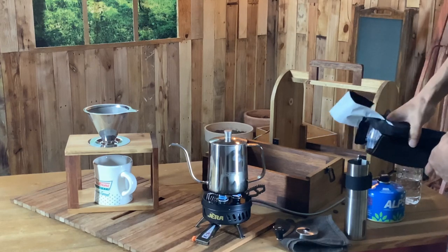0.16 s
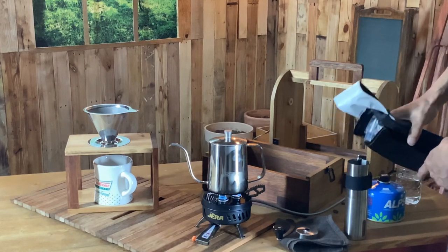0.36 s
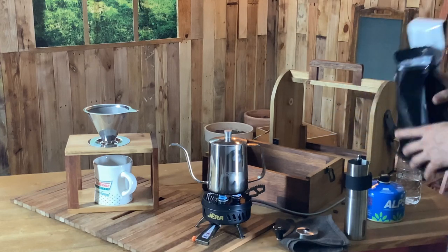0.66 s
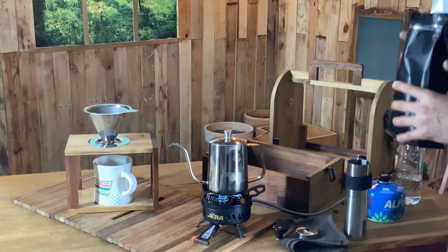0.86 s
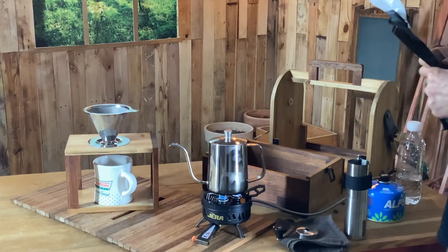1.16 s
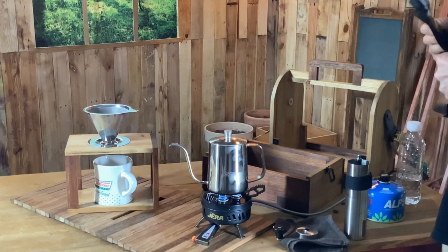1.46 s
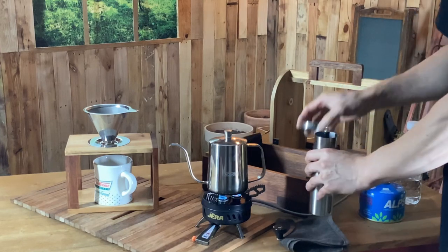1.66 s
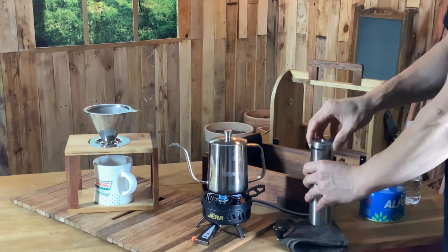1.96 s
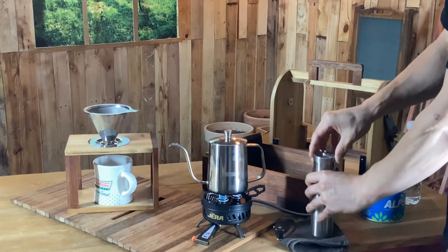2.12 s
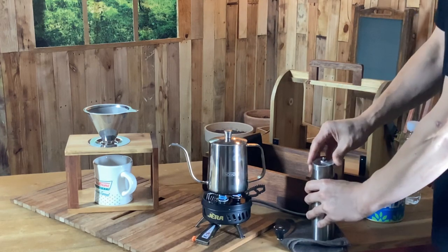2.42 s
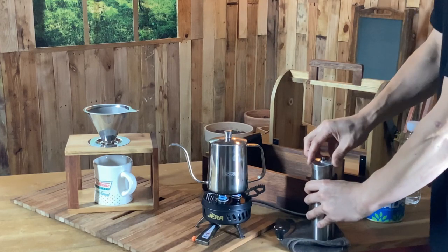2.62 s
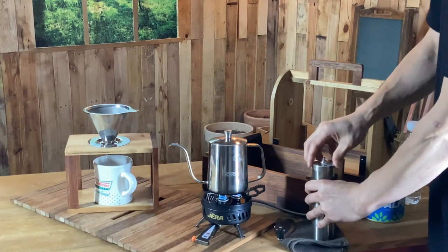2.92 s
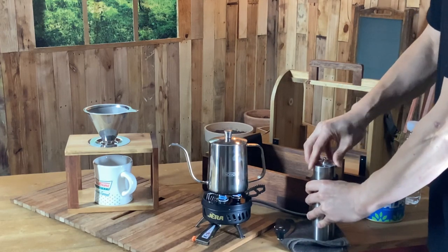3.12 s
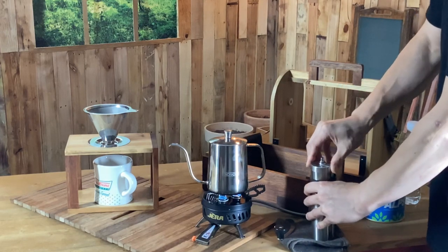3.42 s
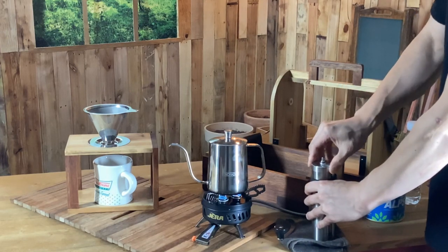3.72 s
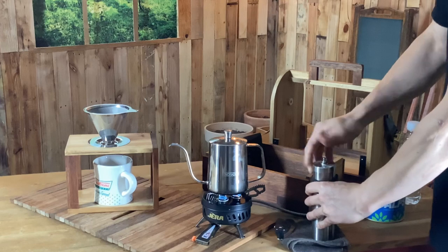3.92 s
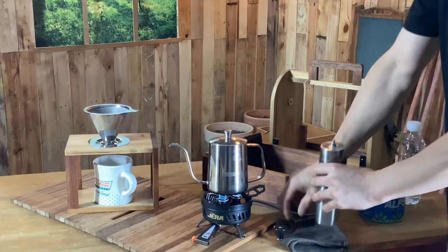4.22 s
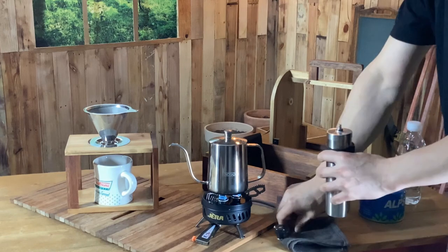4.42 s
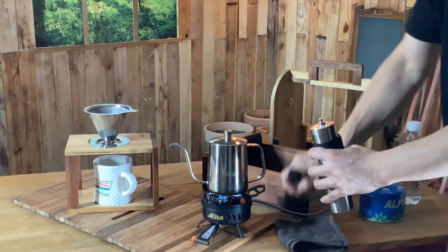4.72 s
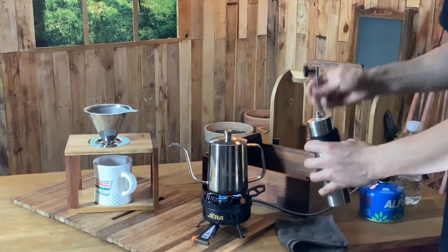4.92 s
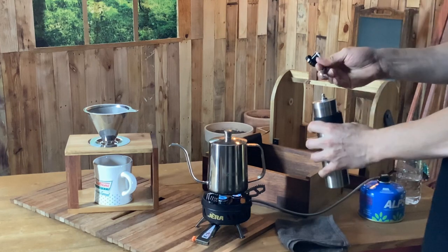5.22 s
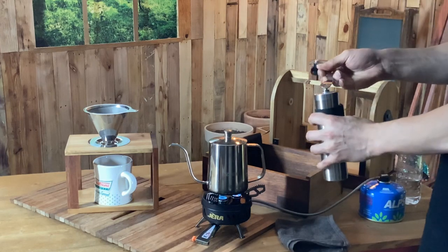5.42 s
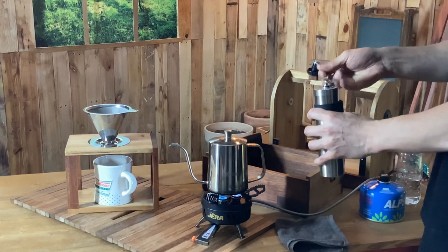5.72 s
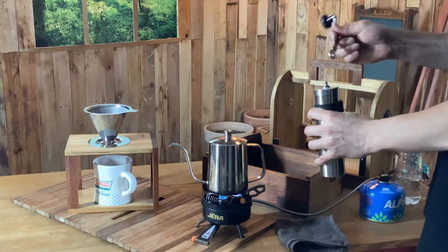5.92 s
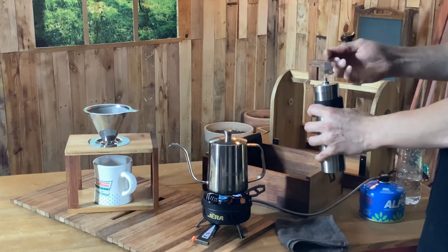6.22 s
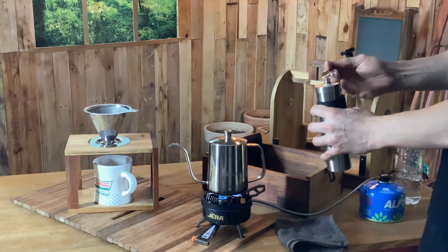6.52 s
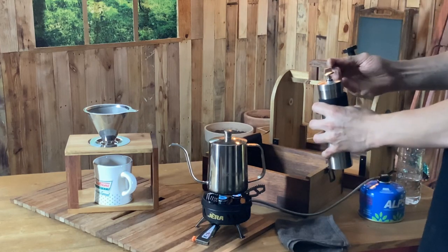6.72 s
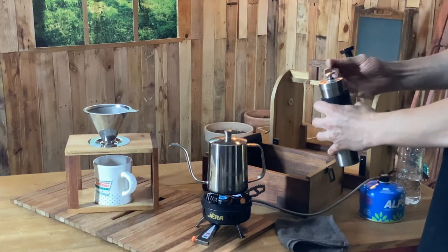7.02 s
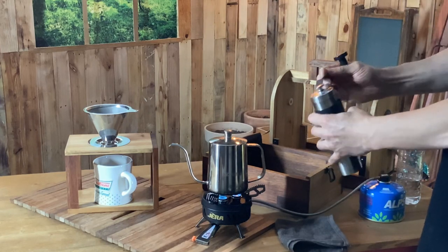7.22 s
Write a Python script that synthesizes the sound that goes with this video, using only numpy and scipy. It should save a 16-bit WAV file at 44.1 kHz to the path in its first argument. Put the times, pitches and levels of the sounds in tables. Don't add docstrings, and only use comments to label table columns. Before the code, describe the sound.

In a reverberant wooden cabin, coffee beans patter in a foil bag that crackles with growing snaps, then cuts off abruptly. A steel grinder lid ticks, scrapes and seats with a dull knock. After a quiet gap, a metal crank clinks brightly and clacks home on its shaft. A gas burner hums and hisses faintly throughout. One distant microphone, slightly limited treble with tiny dropouts.

```python
import sys
import numpy as np
from scipy import signal
from scipy.fft import rfft, irfft
from scipy.io import wavfile
from scipy.ndimage import uniform_filter1d

SR = 44100
rng = np.random.default_rng(int(sys.argv[2]) if len(sys.argv) > 2 else 0)


def undo_db(level):
    steps = np.asarray(level, float) / 20
    return 10 ** steps


def int16_out(signal):
    q = np.round(np.clip(np.atleast_2d(signal).T, -1, 1) * 32767)
    wavfile.write(sys.argv[1], SR, q.astype(np.int16))


N = 324576
T = np.arange(N) / SR

# frequency in Hz, density in dB per Hz.
FOIL_COLOUR = [(88, -68), (150, -7), (226, -5.5), (662, -5.5), (730, -1.5), (821, 0.5), (1980, -1),
               (5790, -6.5), (6390, -15), (14200, -22.5), (16000, -26.5)]
# frequency in Hz, level in dB, t60 in seconds.
LID_MODES = [(1050, -16, .03), (1970, -15, 0.032), (2500, -17, 0.018), (2800, -15, 0.025),
             (4022, -5, 0.065), (4110, -16, .03), (5880, -17, 0.03), (7200, -16, 0.0099), (9560, -19, .015),
             (11100, -24, 0.05), (14010, -28, .015)]
# frequency in Hz, level in dB, t60 in seconds.
GRIPPED_MODES = [(2400, -15, .018), (3887, -9, .024), (4500, -14, .012), (5324, -13, .018), (6090, -9, .05),
                 (6200, 0, .025), (8780, -16, .04), (9500, -25, .015), (11650, -36, .03), (14600, -30, .02),
                 (15500, -30, .02)]
# centre in seconds, length in seconds, lower edge in Hz, depth in dB.
TREBLE_DIPS = [(0.031, 0.019, 6000, -22), (.265, 0.016, 6300, -15), (0.436, 0.013, 5700, -10),
               (0.543, .012, 6300, -15), (1.04, 0.026, 7500, -18), (2.035, .014, 6500, -5),
               (2.955, .014, 5500, -12), (4.744, 0.017, 9100, -15), (5.045, .016, 6360, -8),
               (6.945, .016, 7300, -8), (7.03, .016, 6500, -8)]


def evened(x):
    return x / np.sqrt(np.mean(x ** 2) + 1e-20)


def read(points, hz):
    f, value = np.transpose(points)
    return np.interp(np.log(hz + 1), np.log(f + 1), value)


def add(mix, start_s, sound):
    part = mix[round(start_s * SR):][:len(sound)]
    part += sound[:len(part)]


def colour(x, points):
    gain_db = np.maximum(read(points, abs(np.fft.fftfreq(4096, 1 / SR))), -90)
    log_gain = np.log(undo_db(gain_db))
    taps = np.fft.ifft(np.exp(np.conj(signal.hilbert(log_gain)))).real[:2048]
    return signal.oaconvolve(x, taps / np.linalg.norm(taps))[:len(x)]


def tilt(x, bright_db, split_hz):
    low = signal.sosfilt(signal.butter(2, split_hz, fs=SR, output="sos"), x)
    high = signal.sosfilt(signal.butter(2, split_hz, "high", fs=SR, output="sos"), x)
    return low - undo_db(bright_db) * high


def band(x, lo_hz, hi_hz):
    if lo_hz:
        x = signal.sosfilt(signal.butter(5, lo_hz, "high", fs=SR, output="sos"), x)
    if hi_hz:
        x = signal.sosfilt(signal.butter(5, hi_hz, fs=SR, output="sos"), x)
    return evened(x)


def grains(per_s, spread_db):
    size = undo_db(spread_db * np.minimum(rng.exponential(1, N), 4)) * rng.standard_normal(N)
    return evened(size * (rng.random(N) < per_s / SR))


def ring(modes, detune=0, size=8192):
    t, total = T[:size], np.zeros(size)
    for k, (hz, db, t60_s) in enumerate(modes):
        decay = undo_db(db - 60 * t / t60_s)
        total += (-1) ** k * decay * np.sin(2 * np.pi * hz * (1 + detune) * t)
    return total / 2


def gestures(rows):
    peak_s, swell_s, ebb_s, db, colour_db = np.transpose(rows)[:, :, None]
    t = T[::32]
    fall_db = 20 * np.maximum((peak_s - t) / swell_s, (t - peak_s) / ebb_s)
    power = undo_db(db - fall_db) ** 2 + 1e-30
    total = power.sum(0)
    blend_db = 10 * np.log10((power * undo_db(colour_db) ** 2).sum(0) / total)
    return np.interp(T, t, np.sqrt(total)), np.interp(T, t, blend_db)


def bean_patter():
    # peak in seconds, swell in seconds per 20 dB,
    # ebb in seconds per 20 dB, level in dB, crispness in dB.
    surges = [(0.067, .004, .1, -66, 26), (0.36, .2, .2, -48, -18), (0.535, .25, .14, -32, -5),
              (0.7, .22, .16, -27.5, 1.5), (0.856, .018, .045, -29, -10), (0.918, .008, .3, -37, 0),
              (0.955, .03, .15, -36, 3), (1.03, .1, .25, -35.5, -14), (1.192, .11, .15, -32, 7.5),
              (1.27, .1, .2, -36.5, -7), (1.372, .012, .09, -38.5, 7), (1.456, .012, .09, -33, 6),
              (1.57, .2, .1, -42, 6)]
    # frequency in Hz, density in dB per Hz.
    bean_colour = [(88, -48), (150, -19.5), (282, -6), (387, -8), (466, -6.5), (720, -0.5), (2120, -4),
                   (3500, -16), (4550, -48), (7700, -120)]
    # lower edge in Hz, upper edge in Hz (None is open).
    bands_hz = [(None, 2540), (2040, 7700), (6900, None)]
    level, crisp_db = gestures(surges)
    rattle_db = np.where(T < 0.9, -8.5, -1.5) + 0.4 * crisp_db
    fizz_db = -11 + crisp_db
    thuds = band(colour(grains(1600, 1.6) + 0.62 * rng.standard_normal(N), bean_colour), *bands_hz[0])
    rattle = band(colour(grains(2500, 2.5) + 0.76 * rng.standard_normal(N), FOIL_COLOUR), *bands_hz[1])
    fizz = band(colour(grains(6000, 4.3) + 1.2 * rng.standard_normal(N), FOIL_COLOUR), *bands_hz[2])
    patter = thuds + undo_db(rattle_db) * rattle + undo_db(fizz_db) * fizz
    clumps = evened(uniform_filter1d(uniform_filter1d(rng.standard_normal(N), 400), 400))
    return undo_db(-7.3 + 1.6 * clumps) * level * patter


def foil_snaps():
    # start in seconds, peak in dB, brightness in dB, facet pitch in Hz.
    snaps = [(0.0662, -29, 42, 5330), (0.0794, -44, 12, 4500), (0.145, -50, 6, 4600),
             (0.3217, -38, -19, 1500), (0.3755, -37, -6, 1070), (0.3911, -36, -17, 2220),
             (0.433, -33, -15, 1160), (0.461, -32, -4, 2400), (0.4769, -31, -12, 1140),
             (0.4978, -28, -12, 1130), (0.517, -25, -3, 2200), (0.547, -25, -10, 1200),
             (0.614, -25, -10, 900), (0.6399, -22, -8, 2100), (0.651, -23, -8, 1000), (0.6675, -21, 0, 860),
             (0.693, -23, -4, 1400), (0.718, -24, -6, 1000), (0.764, -27, -8, 900),
             (0.8512, -19, -19, 1880), (0.8614, -30, 2, 800), (0.9148, -21, -4, 2130),
             (0.9244, -21, -8, 1200), (0.9497, -19, 6, 1170), (0.9744, -27, -14, 1000),
             (1.039, -22, 1, 1940), (1.0829, -23, -8, 754), (1.1223, -24, -10, 2160),
             (1.1324, -22, -13, 950), (1.1543, -16, 4, 2020), (1.1823, -9.5, 8, 2200),
             (1.1924, -15, 4, 1200), (1.2064, -14, 14, 3900), (1.2434, -17.5, 6, 2770),
             (1.2545, -14, -4, 1900), (1.285, -24, -8, 1000), (1.372, -27, -1, 2240),
             (1.3815, -23, 9, 2390), (1.3924, -21, -9, 3000), (1.4514, -28, -4, 1000),
             (1.4626, -14, 7, 3400), (1.4744, -21, 10, 5000)]
    out, t = np.zeros(N), T[:2048]
    envelope = undo_db(-60 * t / 0.016) * (1 - np.exp(-t / 0.0019))
    for start_s, db, bright_db, hz in snaps:
        noise, roughness = rng.standard_normal((2, 2048))
        cracks = noise * np.exp(0.85 * roughness) * envelope
        snap = tilt(colour(cracks, FOIL_COLOUR), bright_db, 3660)
        facet = ring([(hz, 0, 6 / hz)], size=2048)
        pop = band(signal.oaconvolve(cracks, facet)[:2048], hz / 2, None)
        add(out, start_s, undo_db(db - 7) * (snap / abs(snap).max() + undo_db(-3) * pop / abs(pop).max()))
    return out


def knocks(events, modes, tick_colour, chatter_s, thud_db):
    # frequency in Hz, density in dB per Hz.
    thud_colour = [(150, -10), (700, 0), (1300, -5), (3000, -31)]
    out, t = np.zeros(N), T[:2048]
    for start_s, db, ring_db, bright_db in events:
        noise = rng.standard_normal(2048)
        chatter = 0.14 * noise * undo_db(-60 * t / chatter_s)
        chatter[16] += 1
        tick = tilt(colour(chatter, tick_colour), bright_db, 7200)
        thud = colour(noise * undo_db(-60 * t / 0.034), thud_colour)
        rung = tilt(ring(modes, 0.002 * noise[0]), bright_db, 7800)
        push_db = thud_db + 0.6 * (db + 35)
        add(out, start_s, undo_db(db - 3.5) * tick / abs(tick).max())
        add(out, start_s, undo_db(push_db) * thud / abs(thud).max())
        add(out, start_s + 0.0005, undo_db(db + ring_db) * rung)
    return out


def lid_knocks():
    # start in seconds, peak in dB, ring in dB, brightness in dB.
    loose_knocks = [(1.8647, -54, 0, -14), (1.9658, -37, 11, 0), (1.9844, -32, 7, 2), (2.0522, -38, 2, -8),
                    (2.0794, -34, -10, -10), (2.143, -40, 1, -12), (2.1656, -44, 2, -10),
                    (2.1894, -44, -2, -6), (2.205, -47, 0, -10)]
    # start in seconds, peak in dB, ring in dB, brightness in dB.
    rim_hits = [
        (1.918, -33, -3.5, 1),
        (1.9223, -32, -4.5, 4),
    ]
    # start in seconds, peak in dB, ring in dB, brightness in dB.
    twist_knocks = [(2.5596, -52, -10, -20), (2.6838, -40, -6, -20), (2.7, -50, 0, -20),
                    (2.7684, -46, 0, -18), (2.8155, -38, 2, -20), (2.8246, -42, 2, -14),
                    (2.8398, -42, 0, -6), (2.852, -42, 0, -6), (2.8629, -25, -12, -12),
                    (2.8744, -34, -10, -3)]
    # start in seconds, peak in dB, ring in dB, brightness in dB.
    seat_knocks = [
        (3.3144, -30, -10, -16),
        (3.3233, -25.5, -10, -5),
    ]
    # frequency in Hz, level in dB, t60 in seconds.
    rim_modes = [(1270, 0, 0.057), (2900, -10, .015), (4100, -9, .03), (4860, -6, .015), (5300, -7, .012),
                 (5810, -8, 0.025), (6500, -8, .01), (7020, -7, 0.012), (8284, -11, 0.071),
                 (11100, -6, .015)]
    # frequency in Hz, level in dB, t60 in seconds.
    twist_modes = [(1050, -14, .03), (1950, -8, .035), (2450, -16, .03), (2850, -5, .035), (3450, -18, .02),
                   (4050, -2, .04), (4550, -7, .025), (5850, -13, .03), (7500, -20, .015),
                   (11100, -24, .04)]
    # frequency in Hz, level in dB, t60 in seconds.
    seat_modes = [(564, 1, 0.017), (804, -2, 0.037), (3000, -16, .015), (5071, 0, 0.017), (8500, -11, 0.06),
                  (11080, -8, 0.057), (14900, -3, .012)]
    # frequency in Hz, density in dB per Hz.
    lid_tick = [(350, -35), (600, -9), (1280, -7), (2010, -14), (3040, 3), (4300, -1), (5710, -24),
                (8740, -7), (16000, -14)]
    # frequency in Hz, density in dB per Hz.
    seat_tick = [(700, -25), (1500, -16), (3500, -1), (5500, 2), (9500, -14), (15000, -5), (16000, -2)]
    out = knocks(loose_knocks, LID_MODES, lid_tick, 0.0071, thud_db=-48)
    out += knocks(seat_knocks, seat_modes, seat_tick, 0.022, thud_db=-42)
    out += knocks(rim_hits, rim_modes, lid_tick, 0.017, thud_db=-54)
    out += knocks(twist_knocks, twist_modes, lid_tick, 0.008, thud_db=-50)
    return out


def crank_knocks():
    # start in seconds, peak in dB, ring in dB, brightness in dB.
    gripped_knocks = [(4.646, -57, -2, -3), (4.6967, -19.5, -5, 3), (5.7986, -36, -5, -8),
                      (5.8282, -39, -5, -3), (5.845, -38, -3, 4), (5.8726, -28, -6, -2),
                      (5.8844, -39, 0, -2), (5.8988, -31.5, -6, -6), (5.981, -27.5, 0, -6),
                      (5.99, -38, 0, 0), (6.0042, -46, 3, 0)]
    # start in seconds, peak in dB, ring in dB, brightness in dB.
    free_knocks = [
        (5.3807, -23.5, -1.5, -1),
    ]
    # start in seconds, peak in dB, ring in dB, brightness in dB.
    edge_knocks = [
        (6.337, -19.5, -5, -4),
    ]
    # start in seconds, peak in dB, ring in dB, brightness in dB.
    clack_knocks = [(5.4876, -42.5, 0, -8), (5.5605, -45.5, -8, -16), (6.7265, -40, -4, -3),
                    (6.7296, -27, -4, -3), (6.741, -40, -6, -3), (7.3454, -55, 6.5, -7)]
    # start in seconds, peak in dB, ring in dB, brightness in dB.
    home_knocks = [
        (6.8283, -26, -8, 6),
        (6.8341, -19.5, -8, -2),
        (6.8397, -32, -6, 2),
        (6.849, -34, -6, 0),
        (6.875, -40, -4, -4),
    ]
    # frequency in Hz, level in dB, t60 in seconds.
    free_modes = [(2430, -9, .018), (3865, -20, .06), (5380, -20, .05), (5700, -1, .025), (6170, -12, .02),
                  (8310, -6, .03), (8450, -14, .06), (8790, -12, .02), (11690, -6, .08), (11790, -7, .025),
                  (13320, -24, .02), (14910, -14, .03)]
    # frequency in Hz, level in dB, t60 in seconds.
    edge_modes = [(2354, -13, 0.027), (3740, -13.5, 0.023), (5130, -16, .02), (5480, -13, 0.037),
                  (5840, -1.5, 0.026), (8230, -8.5, 0.02), (11700, -12.5, 0.021), (13310, -16, .03),
                  (14920, -10, .02)]
    # frequency in Hz, level in dB, t60 in seconds.
    clack_modes = [(1400, -16, .006), (2350, 0, 0.007), (3000, -7, 0.008), (3650, -10, .006),
                   (4270, 3, 0.008), (5150, -2, 0.015), (5830, -4, 0.012), (11600, -8.5, 0.0098),
                   (15000, -12, .02)]
    # frequency in Hz, level in dB, t60 in seconds.
    home_modes = [(996, -9, .01), (1600, -15, .008), (2444, -10, .015), (3564, -9, .01), (4500, 0, .012),
                  (5400, -2, .014), (6110, 2, .018), (6400, -5, .014), (7100, -9, .008), (8800, -13, .025),
                  (11650, -15, .015), (14900, -19, .015)]
    # frequency in Hz, density in dB per Hz.
    gripped_tick = [(700, -50), (1500, -6), (3800, -1.5), (6100, 2.5), (8800, -15), (10600, -43),
                    (14000, -26), (16000, -22)]
    # frequency in Hz, density in dB per Hz.
    free_tick = [(700, -50), (1500, 0.5), (4750, 3), (7200, 0.5), (10500, -6), (12200, -6), (12800, -38),
                 (14000, -32), (16000, -21)]
    # frequency in Hz, density in dB per Hz.
    clack_tick = [(700, -26), (1300, 6), (2600, 2), (5500, 0), (7000, -10), (9600, -6), (11400, -22),
                  (13300, -5), (15000, -5), (16000, -17)]
    out = knocks(gripped_knocks, GRIPPED_MODES, gripped_tick, 0.013, thud_db=-59)
    out += knocks(clack_knocks, clack_modes, clack_tick, 0.038, thud_db=-45)
    out += knocks(free_knocks, free_modes, free_tick, 0.04, thud_db=-53)
    out += knocks(edge_knocks, edge_modes, free_tick, 0.043, thud_db=-52)
    out += knocks(home_knocks, home_modes, clack_tick, 0.035, thud_db=-45)
    return out


def rubbing():
    # peak in seconds, swell in seconds per 20 dB, ebb in seconds per 20 dB,
    # level in dB, brightness in dB.
    lid_strokes = [(1.866, .004, .12, -58, -2), (1.93, .012, .04, -52, 10), (1.984, .025, .045, -46, 12),
                   (2.052, .006, .06, -50, -6), (2.19, .2, .04, -52, -14), (2.56, .008, .13, -55, -30),
                   (2.686, .005, .3, -56, -14), (2.76, .06, .04, -56, 2), (2.817, .004, .25, -53.5, -10),
                   (2.864, .045, .045, -49, 8), (3.324, .012, .12, -50, 4)]
    # peak in seconds, swell in seconds per 20 dB,
    # ebb in seconds per 20 dB, level in dB, brightness in dB.
    crank_strokes = [(4.648, .008, .04, -57, -12), (4.694, .03, .06, -55, -2), (5.8, .03, .3, -63, -3),
                     (5.896, .15, .14, -50, -8), (5.99, .015, .1, -49.5, -8), (6.6, .05, .1, -55, -12),
                     (6.722, .08, .012, -54, -20), (7.347, .008, .1, -70, 9)]
    # frequency in Hz, density in dB per Hz.
    steel_colour = [(180, -52), (300, -0.5), (725, -27), (870, 0.5), (1460, -5), (2840, -5), (4500, -7),
                    (6410, -14), (11300, -27.5), (16000, -20)]
    level, bright_db = gestures(lid_strokes + crank_strokes)
    slips = 0.5 * grains(2500, 2.5) + 0.5 * rng.standard_normal(N)
    lid_song = evened(signal.oaconvolve(slips, ring(LID_MODES))[:N]) * (T < 3.2)
    crank_song = evened(signal.oaconvolve(slips, ring(GRIPPED_MODES))[:N]) * (T > 4)
    sung = 1.5 * (lid_song + crank_song)
    return level * tilt(colour(slips, steel_colour) + 0.1 * sung, bright_db, 4160)


def sliding():
    # start in seconds, length in seconds, level in dB, pitch in Hz, width in Hz.
    slide_rows = [(0.07, .2, -66, 5000, 1800), (1.866, .05, -60, 3900, 900), (2.558, .06, -67, 2450, 250),
                  (6.31, .028, -64, 6100, 150), (6.56, .08, -59, 6050, 180), (6.585, .06, -59, 3300, 600),
                  (6.59, .06, -63, 4250, 400), (6.685, .045, -65, 4270, 250)]
    out, t = np.zeros(N), T[:16384]
    for start_s, length_s, db, hz, width_hz in slide_rows:
        edges_hz = [hz - width_hz / 2, hz + width_hz / 2]
        resonance = signal.butter(2, edges_hz, "band", fs=SR, output="sos")
        whistle = evened(signal.sosfilt(resonance, rng.standard_normal(16384)))
        swell = np.sin(np.pi * np.clip(t / length_s, 0, 1) ** 0.6)
        add(out, start_s, undo_db(db) * swell * whistle)
    return out


def table_hum():
    # frequency in Hz, level in dB, t60 in seconds.
    table_modes = [(153.7, -50.5, 0.93), (252, -50, 0.5), (311, -55, 0.62), (356, -54, 0.22)]
    return 2 * ring(table_modes, size=SR)


def burner():
    # frequency in Hz, density in dB per Hz.
    air_colour = [(18, -36.5), (30, -48.5), (59, -7), (118, -9.5), (266, -1), (311, -10), (426, -7),
                  (473, -12.5), (512, -9), (937, -10), (4080, -38), (5450, -42), (6380, -46),
                  (12600, -44.5), (16000, -54.5)]
    # frequency in Hz, width in Hz, height in dB.
    humps = [(74, 20, 3), (159.3, 23.5, 6.5), (267, 15, 1), (344, 37, 7), (733, 117, -9), (1000, 190, 2.5),
             (2230, 740, 4.5), (2980, 310, -6), (4940, 500, -4), (13100, 1400, 0.5), (5570, 1570, 19)]
    frames, hz = N // 256 + 5, np.fft.rfftfreq(1024, 1 / SR)
    real, imag, patches = rng.standard_normal((frames, 513, 3)).T
    patches = evened(uniform_filter1d(uniform_filter1d(patches, 10, 0), 12, 1))
    flutter = evened(uniform_filter1d(rng.standard_normal(frames), 5))
    jet = np.exp(-((hz - 5600) / 700) ** 2)[:, None]
    spectra = (real + 1j * imag) * undo_db(1.3 * patches + 1.8 * jet * flutter)
    x = signal.istft(spectra, nperseg=1024, noverlap=768)[1][:N]
    hz = np.fft.rfftfreq(N, 1 / SR)
    shape_db = read(air_colour, hz)
    for hump_hz, width_hz, db in humps:
        shape_db = shape_db + db * np.exp(-(2 * (hz - hump_hz) / width_hz) ** 2)
    return undo_db(-54) * evened(irfft(rfft(x) * undo_db(shape_db), N))


def cabin(x, wet_db):
    # frequency in Hz, t60 in seconds.
    cabin_t60 = [(200, 0.47), (1000, 0.59), (3000, 0.68), (6000, 0.54), (10000, 0.53), (16000, 0.33)]
    taps = np.zeros(SR)
    at = np.arange(200, SR - 12, 12)
    at += rng.integers(0, 12, len(at))
    taps[at] = rng.choice([-1., 1.], len(at))
    hz, t, z = signal.stft(taps, SR, nperseg=128)
    decay = undo_db(-60 * t / read(cabin_t60, hz)[:, None])
    tail = signal.istft(z * decay, SR, nperseg=128)[1]
    tail *= 1 + 0.84 * np.exp(-np.arange(len(tail)) / SR / 0.0098)
    return x + undo_db(wet_db) * signal.fftconvolve(x, tail / np.linalg.norm(tail))[:N]


def scene():
    before_change = np.clip((1.592 - T) / 0.00093, 0, 1)
    mix = before_change * cabin(bean_patter() + foil_snaps(), wet_db=-3)
    mix += cabin(lid_knocks(), wet_db=-1.5)
    mix += cabin(crank_knocks(), wet_db=-0.5)
    mix += cabin(rubbing() + sliding(), wet_db=-6)
    add(mix, 0, table_hum())
    mix += burner()
    return np.array([mix, mix])


def flickering(x):
    flicker_s, scrap_s = 0.03, 0.0021
    low = signal.sosfiltfilt(signal.butter(4, 900, fs=SR, output="sos"), x)
    high, out = x - low, x.copy()
    k, scrap = np.arange(round(flicker_s * SR)), round(scrap_s * SR)
    fade = 0.45 * signal.windows.tukey(len(k), 0.5)
    for centre_s, *_ in TREBLE_DIPS:
        if centre_s > 2:
            at = round((centre_s - flicker_s / 2) * SR)
            out[at + k] += fade * (high[at + k % scrap] - high[at + k])
    return out


def dipping_treble(x):
    hz, t, z = signal.stft(flickering(x), SR, nperseg=512, noverlap=384)
    loss_db = -35 * (hz[:, None] > 15750) + 0 * t
    for centre_s, length_s, above_hz, db in TREBLE_DIPS:
        dip = np.exp(-(2 * (t - centre_s) / length_s) ** 4)
        loss_db = loss_db + db * (hz[:, None] > above_hz) * dip
    return signal.istft(z * undo_db(loss_db), SR, nperseg=512, noverlap=384)[1][:N]


def band_limit(x):
    return signal.sosfilt(signal.butter(12, 16670, fs=SR, output="sos"), x)


def record(dry):
    dipped = dipping_treble(dry[0])
    return band_limit(np.array([dipped, dipped]))


dry = scene()
out = record(dry)
int16_out(out)
```